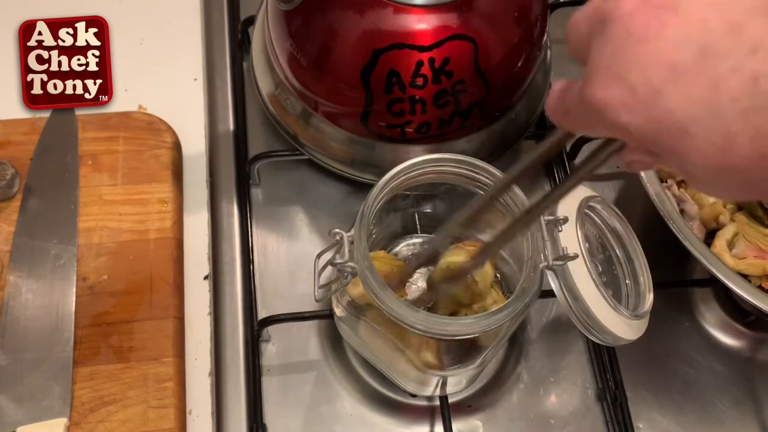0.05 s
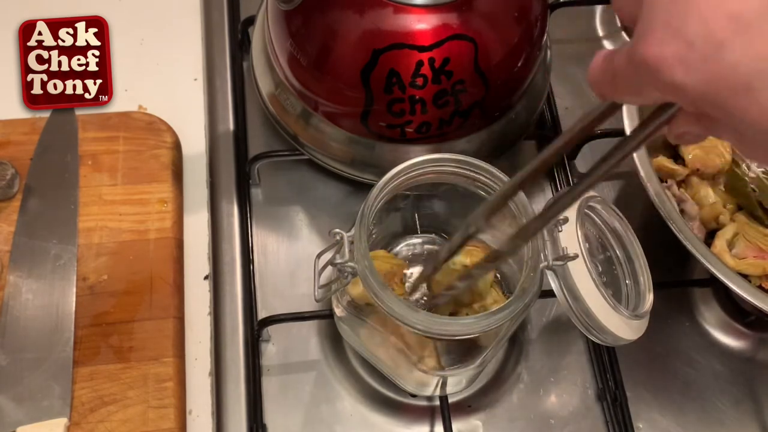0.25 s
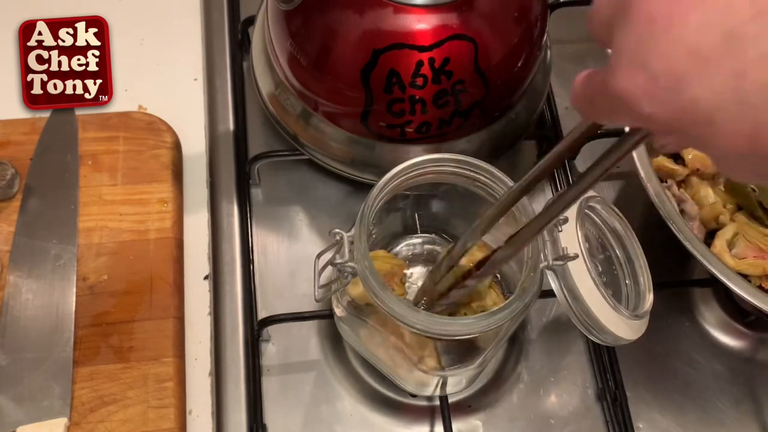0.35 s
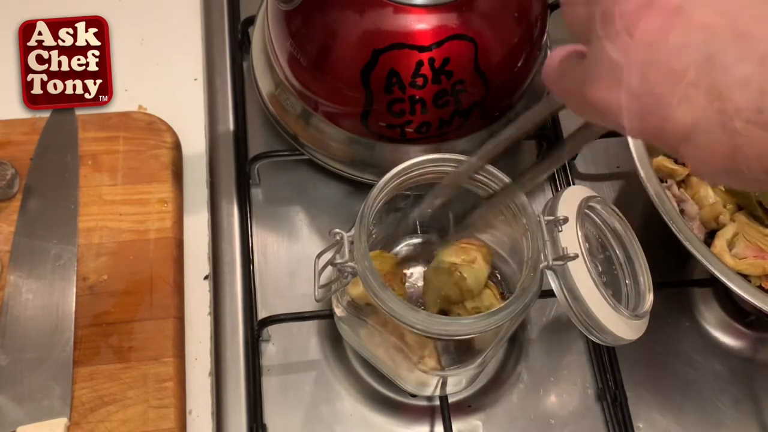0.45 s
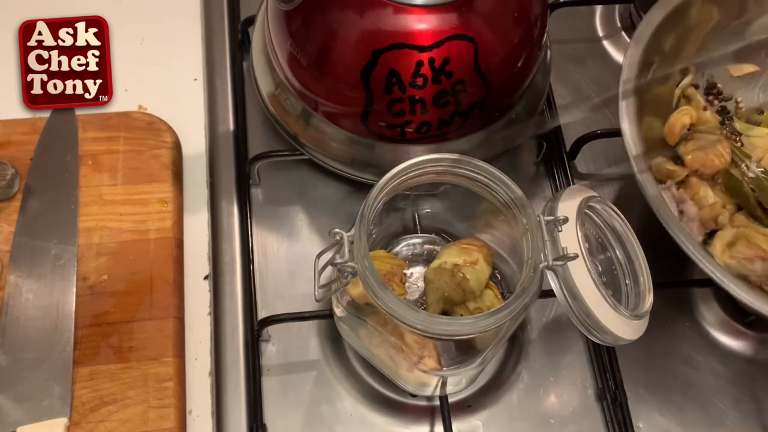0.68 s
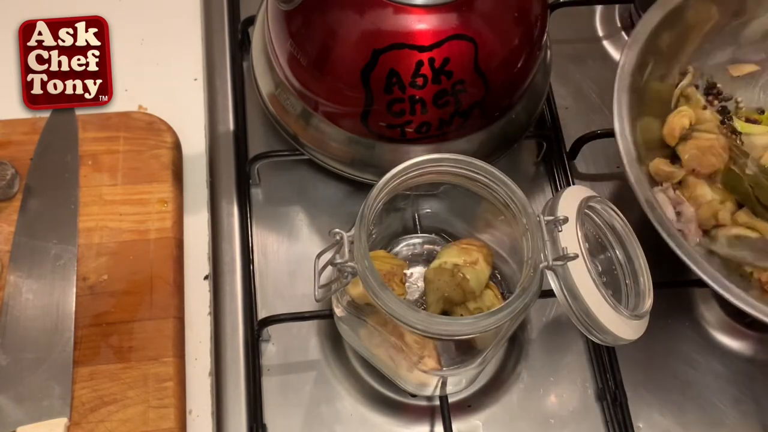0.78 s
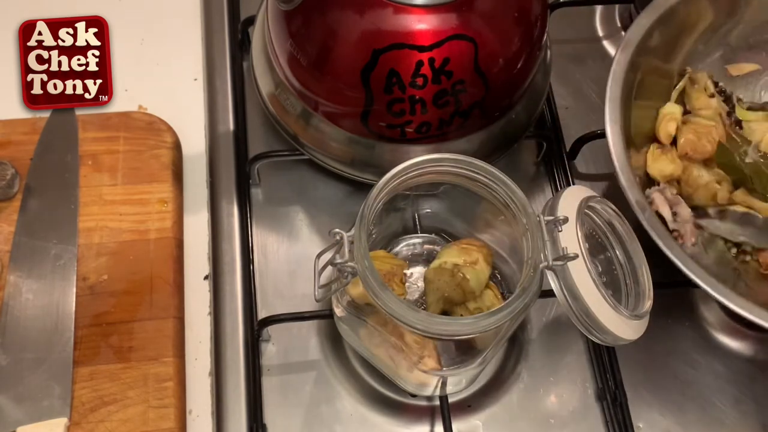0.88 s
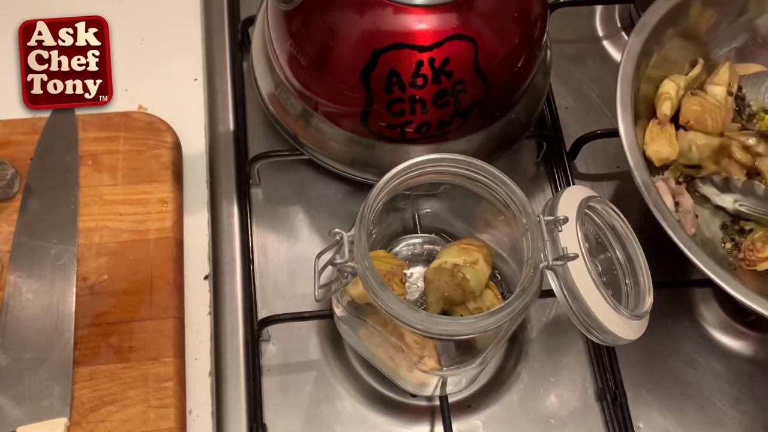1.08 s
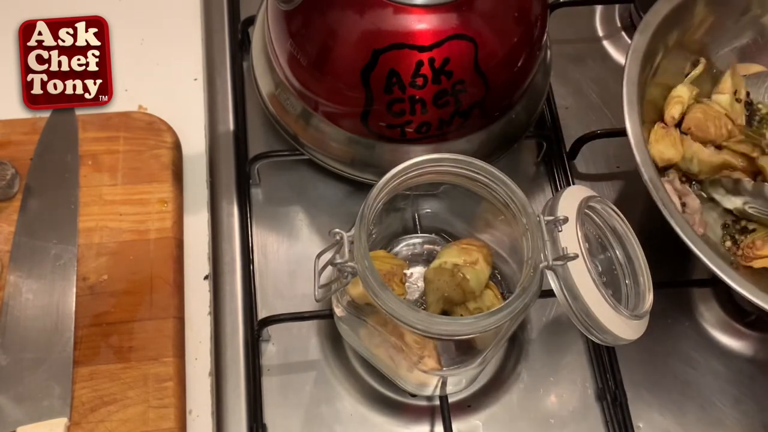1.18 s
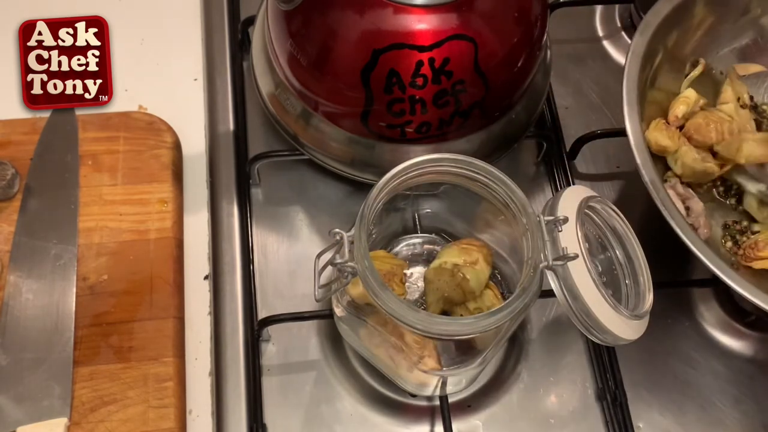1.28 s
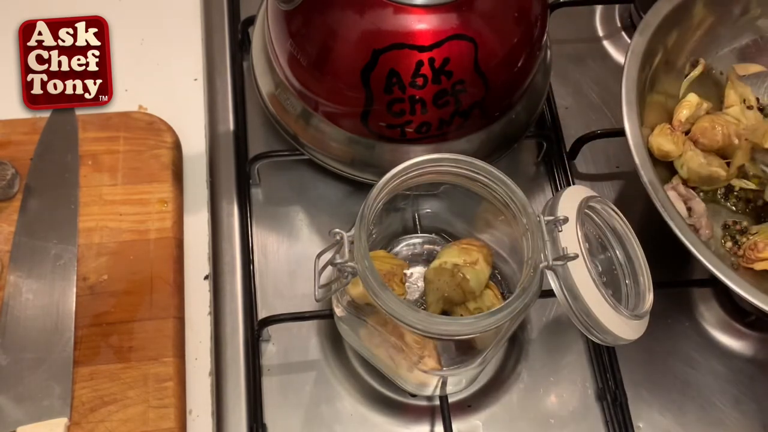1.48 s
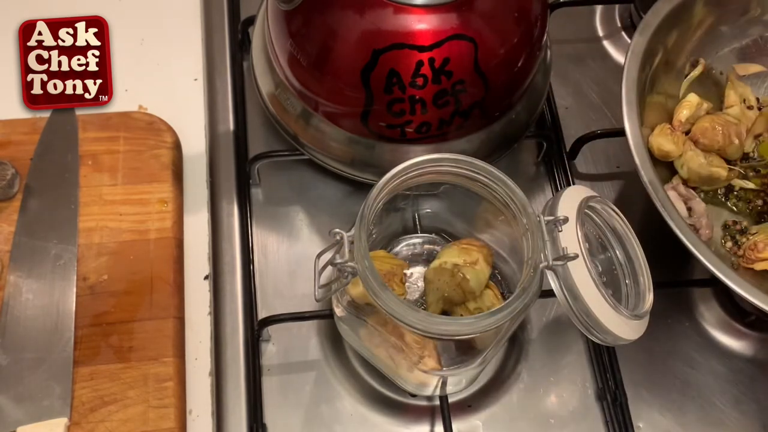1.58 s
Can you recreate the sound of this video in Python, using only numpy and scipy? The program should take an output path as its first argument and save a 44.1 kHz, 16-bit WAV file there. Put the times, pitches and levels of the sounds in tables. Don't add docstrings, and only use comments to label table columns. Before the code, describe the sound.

Steel tongs snap with two bright clacks and tap a glass jar, then after a brief gap scrape grittily in a metal pan with dull knocks and a rattling grate, close up in a small hard kitchen.

```python
import sys
import numpy as np
from scipy import signal
from scipy.fft import rfft, irfft
from scipy.io import wavfile

SR = 44100
rng = np.random.default_rng(int(sys.argv[2]) if len(sys.argv) > 2 else 0)


def natural_amplitude(level_db):
    exponent = np.asarray(level_db, float) / 20
    return 10 ** exponent


def master_out(mix):
    frames = np.transpose(np.atleast_2d(mix))
    ceiling = np.clip(frames, -1, 1)
    pcm = np.round(ceiling * 32767).astype(np.int16)
    wavfile.write(sys.argv[1], SR, pcm)


N = 72765

# start in seconds, level in dB, chatter length in seconds,
# crack centre in Hz, ring level in dB.
TONG_CLACKS = [
    (.1965, -35.5, .002, 7000, -19),
    (.2001, -11.5, .003, 6500, -8.5),
    (.2036, -15, .002, 6590, -9.5),
    (.208, -18.5, .006, 7500, -16.5),
    (.221, -28, .004, 7000, -13),
    (.233, -36, .004, 6000, -17),
    (.3848, -22.5, .002, 9000, -19.5),
    (.3878, -27, .005, 7500, -21.5),
    (.397, -30.5, .005, 7500, -8.5),
]
# start in seconds, level in dB, chatter length in seconds,
# crack centre in Hz, ring level in dB.
JAR_TAPS = [
    (.432, -25.5, 0.007, 7000, -14),
    (.4422, -9, 0.005, 11000, -11.5),
    (.4455, -17, 0.0044, 7500, -4),
    (.453, -24.5, 0.0083, 8000, -12),
]
# start in seconds, level in dB, chatter length in seconds,
# crack centre in Hz, ring level in dB.
PAN_TICKS = [
    (.6335, -40.5, 0.0015, 8640, 2.5),
    (.7811, -31.5, 0.0042, 6750, 9),
    (.9012, -48, 0.0026, 7000, -23),
    (.9241, -49.5, 0.0034, 7000, -9),
    (.9986, -39, 0.021, 8000, 6.5),
    (1.1199, -43, 0.0049, 4400, -40),
    (1.1807, -42.5, 0.0025, 10000, -26),
    (1.2364, -56, 0.007, 6800, -19),
    (1.5863, -59.5, .006, 6000, -8),
    (1.6382, -59.5, 0.0051, 7000, -11),
]
# start in seconds, level in dB, chatter length in seconds,
# crack centre in Hz, ring level in dB.
THIN_TICK = [(1.3643, -47.5, 0.0012, 11960, -43)]
# start in seconds, level in dB, pitch in Hz.
TIP_CATCHES = [(.188, -44, 6900), (.638, -41, 6500), (.646, -41, 6300), (.6558, -39, 6400),
               (.6625, -39, 6200), (.679, -42, 6500), (.6955, -35, 6250), (.7005, -39, 6400),
               (.7035, -40, 6200), (.714, -43, 6400), (.721, -40, 6500), (.7272, -35, 6330),
               (.7312, -36, 6450), (.7368, -37, 6200), (.7565, -41, 6450), (.767, -43, 6330)]
# start in seconds, level in dB, swell in seconds, pitch in Hz.
WALL_KNOCKS = [
    (.428, -53.5, 0.0079, 998),
    (.777, -40.5, 0.01384, 691),
    (.777, -52.5, 0.01295, 385),
    (.924, -41.5, 0.016, 797),
    (.955, -44, 0.011, 800),
    (1.083, -51.5, 0.01555, 798),
    (1.102, -45, .014, 783),
    (0.631, -61.5, 0.01, 1372),
]
# start in seconds, level in dB, contact in seconds, pitch factor.
GRATE_BUMPS = [(.207, -51, 0.002, 1.06), (.218, -44.5, 0.006, 0.85), (.386, -50, 0.00064, 0.89),
               (.96, -45, 0.0052, .55), (.995, -49, 0.001, 1.), (1.099, -35, 0.001, 1.03),
               (1.107, -33.5, 0.001, 1.), (1.127, -38, 0.00136, 0.95), (1.15, -45, 0.0029, 0.98),
               (1.187, -43, 0.0017, 0.9), (1.197, -43.5, 0.0014, 1.02), (1.222, -46, 0.0042, 1.),
               (1.25, -50, 0.0031, 0.97)]

# pitch in Hz, level in dB, time to fall 60 dB in seconds.
TONG_MODES = [(2345, -10.5, 0.37), (2607, -11.5, 0.067), (3530, -10, 0.17), (3270, -12, .12),
              (3970, 4.5, 0.12), (6153, -6, .2), (6520, -15, 0.17), (7060, 1, .14), (7730, -7, 0.6),
              (9540, -8, 0.12), (10000, -1, 0.34), (11300, -10.5, 0.063), (499, -26.5, 0.4)]
JAR_MODES = [(950, -24, 0.1), (1992, -23, 0.3), (2060, -25, .22), (3451, -5, .086), (3980, -6, .05),
             (5545, -6, .14), (520, -30, .12), (6993, -6, 0.17), (7483, -10, .18), (7903, -6, 0.1),
             (10660, -8, .16), (11000, -4, 0.1), (11540, -8, 0.084)]
PAN_MODES = [(5862, -12.5, 0.031), (6244, 12, .045), (6400, -12, .05), (6580, -9.5, 0.071), (6900, 2, 0.15),
             (7200, -4.5, 0.06), (7440, -5.5, 0.061), (10000, -16.5, .05)]
TIP_MODES = [(5900, -6, .02), (6330, 0, .025), (6900, -5, .02), (10800, -14, .015)]
WALL_MODES = [(626, -2, .1), (690, -9.5, 0.031), (1246, -13, 0.2), (1372, 4.5, 0.063)]
GRATE_MODES = [(189, -12.5, 0.08), (208, -1, 0.18), (212, -5, 0.24), (333, -3.5, 0.18), (335.3, -8, 0.16),
               (428, -1, 0.17), (616, -3.5, .09)]

# time in seconds, level in dB, duller drag in dB.
SLIDE_PRESSURE = [(0, -70.5, 7.5), (0.074, -85, -9), (0.169, -90.5, 1), (0.181, -62.5, 4),
                  (0.197, -48.5, 1.5), (0.204, -48.5, -8.5), (.63, -87, 14.5), (.637, -43.5, -59),
                  (.675, -50, -53), (0.728, -43.5, -71.5), (0.779, -42.5, -12), (.87, -51.5, -8),
                  (0.931, -44, -9), (.99, -53, -5.5), (1.07, -60.5, -2.5), (1.196, -55, -5.5),
                  (1.329, -86.5, -13.5), (1.58, -83.5, -3), (1.65, -57.5, -2.5)]
# frequency in Hz, gain in dB.
GRIT_TONE = [(1500, -59), (3000, -29), (5000, -11.5), (6500, -10.5), (9000, -6), (12000, -14), (16000, -16)]
# frequency in Hz, gain in dB.
DRAG_TONE = [(200, -7), (600, -1.5), (1500, 3), (3500, 4), (6000, -4)]
# time in seconds, level in dB.
STOVE_SWAY = [(0, -62), (0.201, -72), (0.268, -49), (.33, -51), (0.381, -65.5), (0.601, -72.5), (.95, -69),
              (1.02, -52.5), (1.07, -56.5), (1.2, -45), (1.328, -51), (1.43, -66), (1.5, -81.5),
              (1.65, -66)]
# frequency in Hz, gain in dB.
AIR_TONE = [(18, -55), (30, -24.5), (199, -9.5), (273, -13), (311, -4), (374, -32), (461, -21),
            (11100, -52.5), (16000, -34.5)]
# time in seconds, level in dB.
AIR_LEVEL = [(0.058, 4), (0.08, 20), (.17, 10.5), (1.25, 6.5), (1.35, -6.5), (1.481, 7), (1.52, 13.5),
             (1.599, 11.5)]
# frequency in Hz, time to fall 60 dB in seconds.
KITCHEN_DECAY = [(200, 0.4), (2000, 0.32), (9000, 0.26), (15000, 0.21)]
# frequency in Hz, gain in dB.
UNSHARED_TAIL = [(100, -33), (300, -6.5), (700, -4.5), (1400, -3.5), (2200, -2.5), (3600, -13.5),
                 (4400, -18), (8000, -26)]
# frequency in Hz, gain in dB.
TREBLE_FALL = [(12100, 1), (12600, -2), (14400, -7), (15200, -5.5), (15800, -11), (16400, -27.5)]
# frequency in Hz, gain in dB.
PORT_BALANCE = [(50, 1.4), (150, 2.6), (300, 3.3), (700, -3.5), (1300, 0), (16000, 0)]
# frequency in Hz, angle in radians.
PORT_PHASE = [(60, 0), (200, .5), (600, 1.9), (1400, 2.2), (2000, 2.6), (3100, 3.46), (4500, 3.66),
              (9000, 3.56)]


def read(points, hz):
    f, value = np.transpose(points)
    return np.interp(np.log(hz + 1), np.log(f + 1), value)


def over_time(times, values):
    return np.interp(np.arange(N) / SR, times, values)


def evened(x):
    return x / np.sqrt(np.mean(x ** 2) + 1e-20)


def colour(x, gain):
    return irfft(rfft(x) * gain(np.fft.rfftfreq(x.shape[-1], 1 / SR)), x.shape[-1])


def low_cut(x, hz):
    return signal.sosfilt(signal.butter(2, hz, "high", fs=SR, output="sos"), x)


def add(mix, s, sound):
    part = mix[round(s * SR):][:len(sound)]
    part += sound[:len(part)]


def ring(modes, pitch=1, spread_db=0, split=.01):
    t = np.arange(SR // 2) / SR
    luck = rng.uniform(-1.2, 1, (4 * len(modes), 3))
    x = np.zeros(len(t))
    for k, ((hz, db, t60), (u, v, w)) in enumerate(zip(4 * list(modes), luck)):
        detune = 1 + split * v * (k >= len(modes))
        decay_db = 60 * t / (t60 * (1 + 0.067 * w))
        x += natural_amplitude(db + spread_db * u - decay_db) * np.sin(2 * np.pi * hz * pitch * detune * t)
    return x / np.abs(x).max()


def strikes(rows, modes, octaves, fade_s, split, cut_hz):
    out = np.zeros(N)
    t = np.arange(2048) / SR
    for s, db, length, hz, ring_db in rows:
        fade = np.exp(-np.maximum(t - length, 0) / fade_s - .5 * t / length)
        shape = fade * (1 + 0.52 * np.exp(-t / 0.0025))
        crack = colour(rng.standard_normal(2048), lambda f: np.exp(-(np.log2((f + 1) / hz) / octaves) ** 2))
        drive = rng.standard_normal(2048) ** 3 * (t < length) * 0.45 + (t == 0)
        body = signal.fftconvolve(drive / np.linalg.norm(drive), ring(modes, spread_db=0.5, split=split))
        add(out, s, natural_amplitude(db) * evened(crack) * shape * np.minimum(t / 0.0001, 1))
        add(out, s, natural_amplitude(db + ring_db) * 2 * body)
    return low_cut(out, cut_hz)


def tong_clacks():
    return strikes(TONG_CLACKS, TONG_MODES, octaves=1.574, fade_s=0.0033, split=.008, cut_hz=340)


def jar_taps():
    return strikes(JAR_TAPS, JAR_MODES, octaves=1.36, fade_s=0.002, split=.014, cut_hz=390)


def pan_ticks():
    ticks = strikes(PAN_TICKS, PAN_MODES, octaves=1.0, fade_s=0.0063, split=0.022, cut_hz=2900)
    return ticks + strikes(THIN_TICK, PAN_MODES, octaves=0.14, fade_s=0.012, split=0, cut_hz=3500)


def scrape():
    grains_per_s, spread_db, pan_db, wall_db = 1900, 3, -13.5, -19.5
    s, db, drag_db = np.transpose(SLIDE_PRESSURE)
    size = natural_amplitude(spread_db * np.minimum(rng.exponential(1, N), 5))
    grains = size * (rng.random(N) < grains_per_s / SR) * rng.choice([-1, 1], N)
    grit = evened(grains) + 1.5 * rng.standard_normal(N)
    level = natural_amplitude(over_time(s, db))
    direct = evened(colour(grit, lambda f: natural_amplitude(read(GRIT_TONE, f))))
    drag = evened(colour(grit, lambda f: natural_amplitude(read(DRAG_TONE, f)) * (f < 9000)))
    drag = drag * natural_amplitude(over_time(s, drag_db))
    pan, wall = ring(PAN_MODES, split=.03), ring(WALL_MODES, split=.01)
    body = natural_amplitude(pan_db) * pan / np.linalg.norm(pan) + natural_amplitude(wall_db) * wall / np.linalg.norm(wall)
    return (direct + drag) * level + signal.fftconvolve(grit * level, body)[:N]


def tip_catches():
    rise_s = 0.00078
    out = np.zeros(N)
    rise = np.minimum(np.arange(3000) / SR / rise_s, 1)
    for s, db, hz in TIP_CATCHES:
        tip = ring(TIP_MODES, hz / TIP_MODES[1][0], spread_db=3, split=.02)[:3000]
        add(out, s, natural_amplitude(db) * 2 * rise * tip)
    return out


def wall_knocks():
    t60_s, ring_db = 0.021, -3
    out, t = np.zeros(N), np.arange(SR // 4) / SR
    for s, db, swell, hz in WALL_KNOCKS:
        rise = np.sin(np.pi / 2 * np.minimum(2 * t / swell, 1)) ** 2
        fall = natural_amplitude(-60 * np.maximum(t - swell / 2, 0) / t60_s)
        pair = np.sin(2 * np.pi * hz * t) + 0.44 * np.sin(2 * np.pi * (1.17 * hz * t + rng.random()))
        add(out, s, natural_amplitude(db) * 2 * rise * fall * pair)
        add(out, s + swell / 4, natural_amplitude(db + ring_db) * 2 * ring(WALL_MODES, spread_db=6.5, split=0.017))
    return out


def grate_bumps():
    out, t = np.zeros(N), np.arange(1500) / SR
    for s, db, contact, pitch in GRATE_BUMPS:
        push = np.sin(np.pi * np.arange(0, contact, 1 / SR) / contact) ** 2
        rattle = (t == 0) + 0.04 * rng.standard_normal(1500) * np.exp(-t / 0.015)
        grate = ring(GRATE_MODES, pitch, spread_db=1.5, split=0.023)
        x = signal.fftconvolve(np.convolve(push, rattle), grate)
        add(out, s, natural_amplitude(db) * 2 * x / np.abs(x).max())
    return low_cut(out, 130)


def stove():
    sway_hz, width_hz = 65.5, 5
    s, db = np.transpose(STOVE_SWAY)
    hum = colour(rng.standard_normal(N), lambda f: 1 / (1 + ((f - sway_hz) / width_hz) ** 2))
    hum = hum / (0.34 + abs(signal.hilbert(evened(hum))))
    return evened(hum) * natural_amplitude(over_time(s, db))


def air():
    level_db = -83
    s, db = np.transpose(AIR_LEVEL)
    tone = evened(colour(rng.standard_normal(N), lambda f: natural_amplitude(read(AIR_TONE, f))))
    return natural_amplitude(level_db + over_time(s, db)) * tone


def kitchen(x):
    wet_db = -13
    taps = np.zeros((3, SR // 2))
    at = np.arange(120, SR // 2 - 20, 20) + rng.integers(0, 20, (3, (SR // 2 - 121) // 20))
    np.put_along_axis(taps, at, rng.choice([-1., 1.], at.shape), 1)
    hz, t, z = signal.stft(taps, SR, nperseg=256)
    decay = natural_amplitude(-60 * t / read(KITCHEN_DECAY, hz)[:, None])
    tail = signal.istft(z * decay, SR, nperseg=256)[1]
    wet = signal.fftconvolve(x[None], tail / np.linalg.norm(tail[0]), axes=1)[:, :N]
    return natural_amplitude(wet_db) * wet[0] + colour(wet[1:], lambda f: natural_amplitude(read(UNSHARED_TAIL, f)))


def scene():
    tongs = tong_clacks() + jar_taps() + pan_ticks() + scrape() + tip_catches()
    near = tongs + wall_knocks() + grate_bumps()
    return near + kitchen(near + air()) + air() + stove()


def band_limit(x):
    return signal.sosfilt(signal.butter(12, 16800, fs=SR, output="sos"), x)


def record(dry):
    edge_hz, delay_s = 16500, 10.2 / 44100

    def port(f, side):
        return natural_amplitude(read(TREBLE_FALL, f) + side * read(PORT_BALANCE, f) / 2) * (f < edge_hz)

    def turn(f):
        return np.exp(1j * (read(PORT_PHASE, f) - 2 * np.pi * f * delay_s))

    left = colour(dry[0], lambda f: port(f, 1))
    right = colour(dry[1], lambda f: port(f, -1) * turn(f))
    return band_limit(np.clip([left, right], -.8, .8))


dry = scene()
out = record(dry)
master_out(out)
```